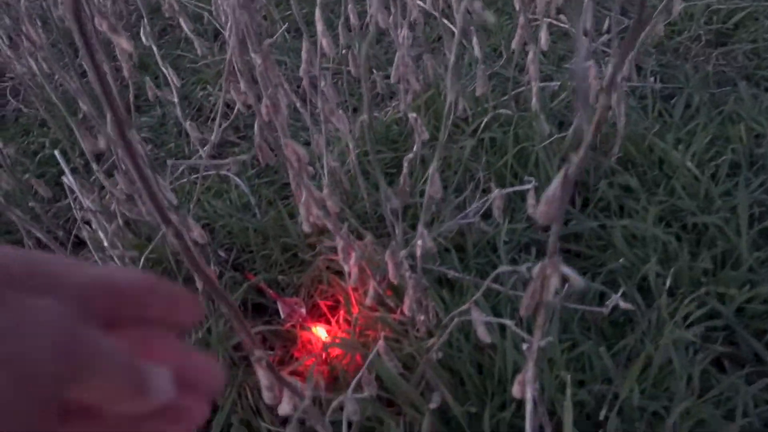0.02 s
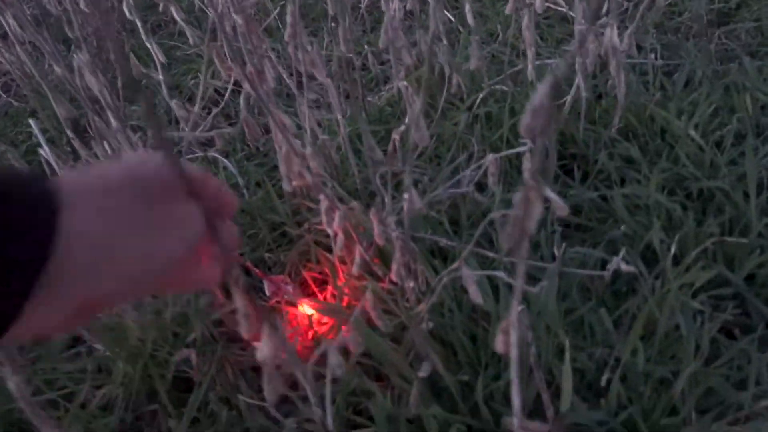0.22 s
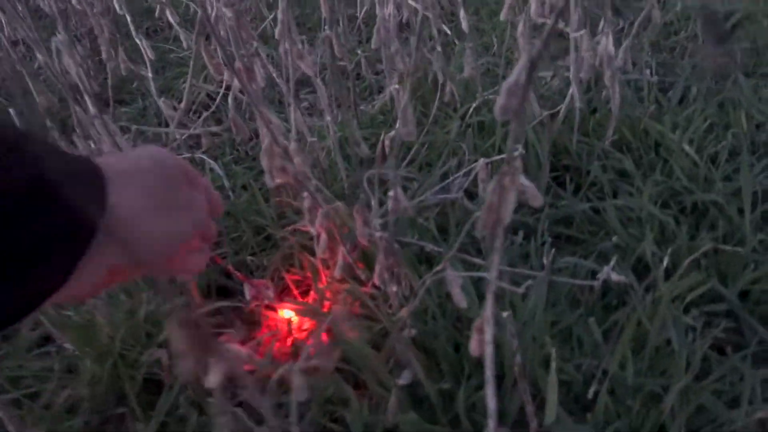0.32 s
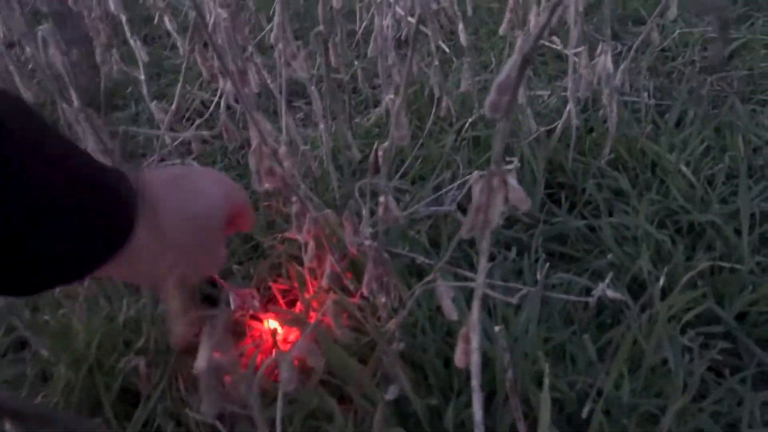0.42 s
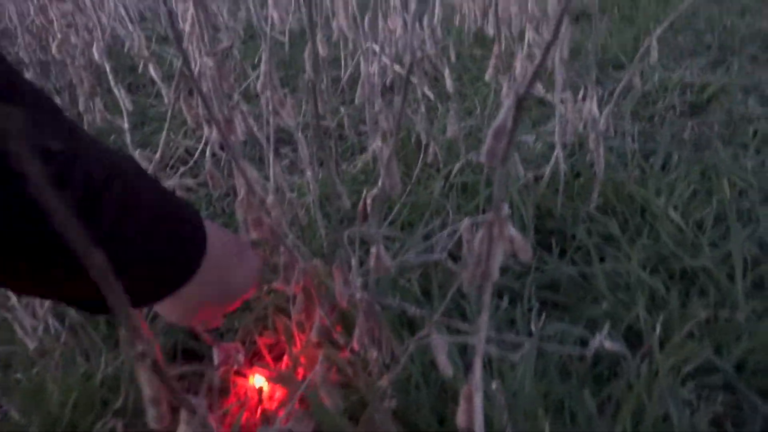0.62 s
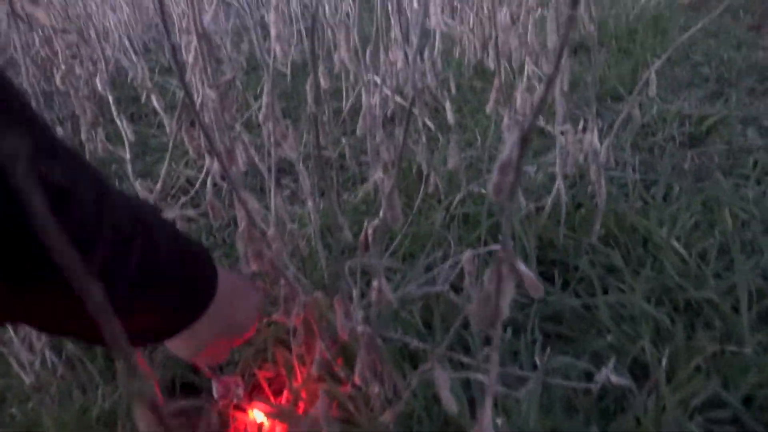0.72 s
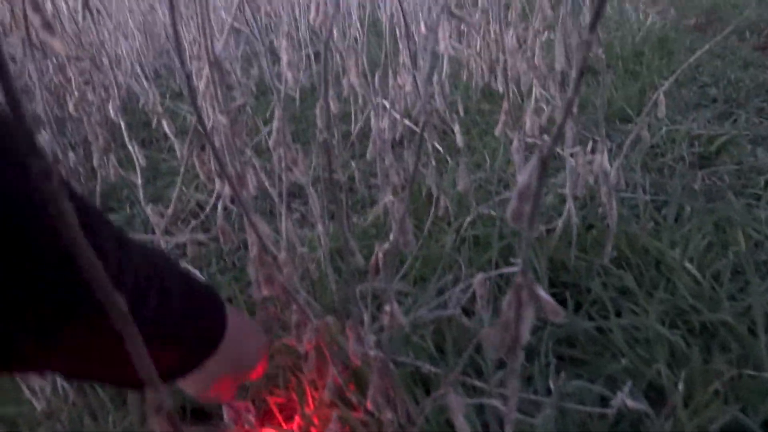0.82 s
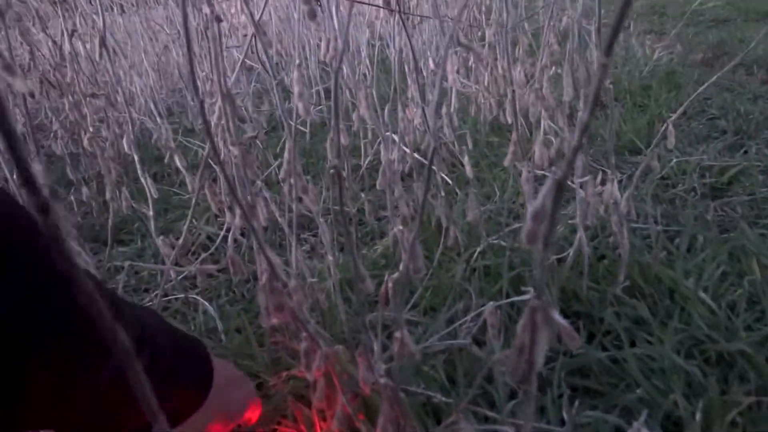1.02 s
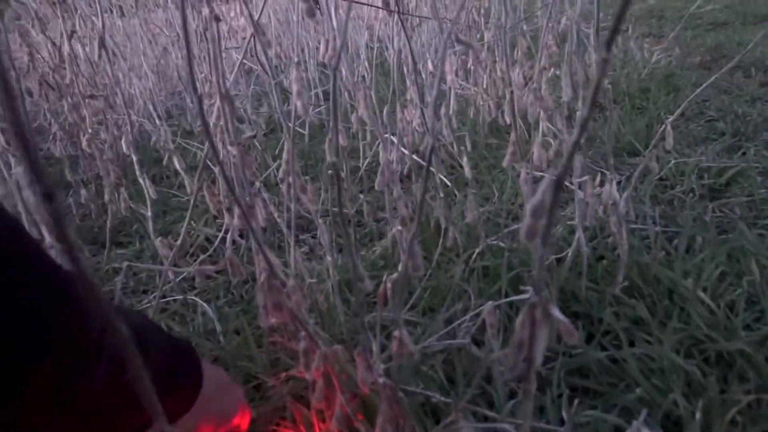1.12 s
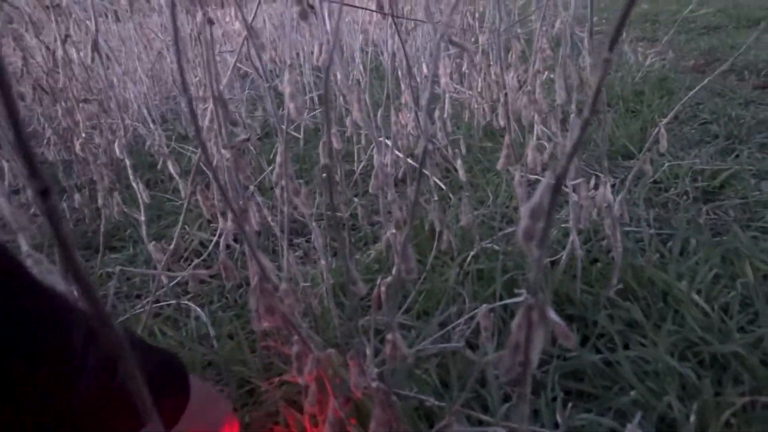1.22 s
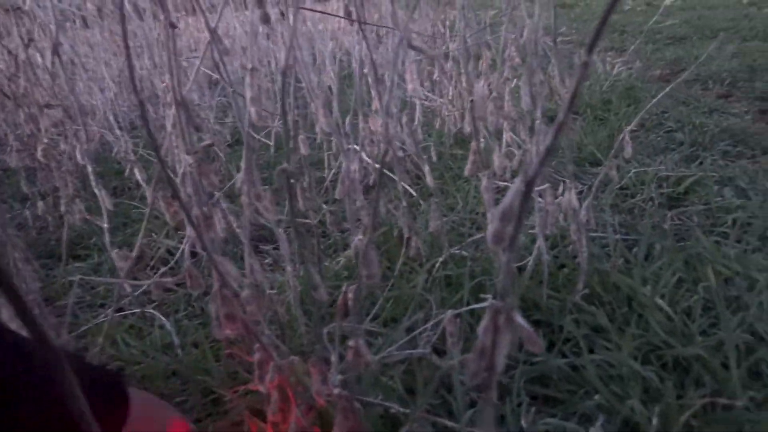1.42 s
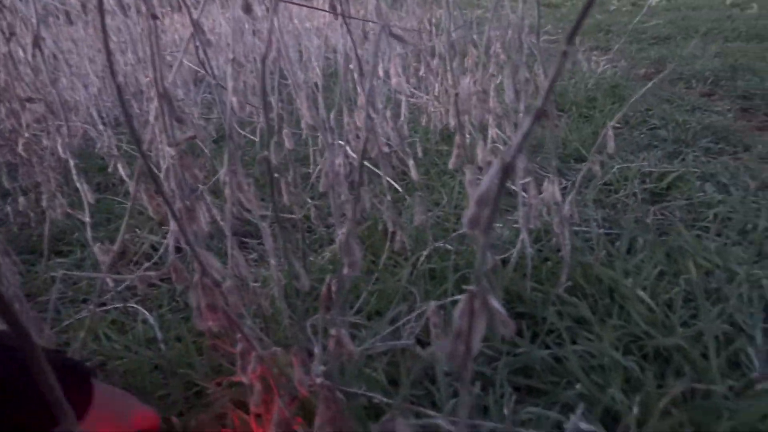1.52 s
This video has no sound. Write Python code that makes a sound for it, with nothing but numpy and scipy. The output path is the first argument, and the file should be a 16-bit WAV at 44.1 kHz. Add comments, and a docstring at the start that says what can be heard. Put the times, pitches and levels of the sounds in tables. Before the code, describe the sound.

One step through brittle dry plants: sparse snaps, cloth rub and dull thud, then a loud bright crackle with rasping stalks and low bumps, fading to scattered clicks over faint open-air rumble, close microphone.

```python
"""A step through dry soybeans

One step through dry standing soybeans, close to a hand-held microphone outdoors.
Pods snap as short noise bursts, stalks scrape as stick-slip clicks through a resonance, and thick stems
crack as ringing modes with a noise tail. Litter rustles and papery leaves tick as random grains.
The sleeve is muffled noise, the foot thuds are damped low swings, and filtered noise makes
the faint outdoor rumble and drone."""
import sys
import numpy as np
from scipy import signal
from scipy.fft import rfft, irfft, next_fast_len
from scipy.io import wavfile

SR = 44100
rng = np.random.default_rng(int(sys.argv[2]) if len(sys.argv) > 2 else 0)


def generate_wav(sig):
    """Save sig (samples, or channels by samples) to the path in sys.argv[1] as 16-bit PCM at SR."""
    pcm = np.round(np.clip(np.atleast_2d(sig).T, -1, 1) * 32767).astype(np.int16)
    wavfile.write(sys.argv[1], SR, pcm)


N = 68355  # samples
T = np.arange(N) / SR  # seconds


def undb(db):
    """Decibels to gain."""
    return 10 ** (np.asarray(db) / 20)


def unit(x):
    """Scale to an rms of one."""
    return x / np.sqrt(np.mean(x ** 2) + 1e-20)


def burst(x):
    """Scale a short sound so its energy equals an rms of one over a hundredth of a second."""
    return x / np.sqrt(np.sum(x ** 2) / (SR / 100) + 1e-20)


def seconds(ms):
    """Milliseconds to seconds, kept just above zero."""
    return ms / 1000 + 1e-6


def noise():
    """White noise."""
    return rng.standard_normal(N)


def curve(points):
    """Gain over time from points in seconds and dB, held flat beyond either end."""
    times, levels_db = np.array(points).T
    return undb(np.interp(T, times, levels_db))


def colour(x, points):
    """Causal minimum-phase filter with a response given as points in Hz and dB."""
    hz, db = np.array(points, float).T
    size = 2 * next_fast_len(N)
    freq = np.maximum(np.arange(size // 2 + 1) * SR / size, 1)
    response_db = np.interp(np.log(freq), np.log(hz), db)
    # folding the cepstrum onto positive times makes the filter causal
    cepstrum = irfft(np.log(undb(response_db)))
    cepstrum[1:size // 2] *= 2
    cepstrum[size // 2 + 1:] = 0
    return irfft(rfft(x, size) * np.exp(rfft(cepstrum)))[:N]


def band(x, lo_hz, hi_hz, order=2):
    """Band-pass between two edges."""
    return signal.sosfilt(signal.butter(order, [lo_hz, hi_hz], 'band', fs=SR, output='sos'), x)


def fade(start, decay_s):
    """Sudden start and exponential decay."""
    return (T >= start) * np.exp(-np.maximum(T - start, 0) / decay_s)


def grains(per_s, spread_db):
    """Random clicks of either sign: a positive spread makes a few stronger, a negative one weaker."""
    size = undb(spread_db * np.minimum(rng.exponential(size=N), 3.5))
    struck = rng.random(N) < per_s / SR
    return unit(struck * np.sign(noise()) * size)


def sweep(x, hz, width_hz):
    """Resonance whose centre moves from sample to sample."""
    # turn the moving centre down to zero, smooth there with two equal poles, then turn back
    turn = np.exp(2j * np.pi * np.cumsum(hz) / SR)
    pole = np.exp(-np.pi * width_hz * np.sqrt(2) / SR)
    smoothed = signal.lfilter([(1 - pole) ** 2], np.poly([pole, pole]), x / turn)
    return (smoothed * turn).real


# Open air around the microphone. Each row: frequency in Hz, response in dB.
AIR_RESPONSE = [(15, -1.5), (28, 7.5), (40, -1.5), (55, -3.5), (100, -18.5), (190, -21.5), (250, -13.5),
                (400, -23), (2000, -33), (6000, -54), (12000, -46), (16000, -34.5)]


def air():
    """Faint outdoor rumble and hiss, as steady filtered noise."""
    return undb(-43.5) * unit(colour(noise(), AIR_RESPONSE))


# Resonances of a faint low drone. Each row: centre in Hz, width in Hz, level in dB before the drone's swell.
DRONE_RESONANCES = [(239.8, 35, -51), (545, 95, -57)]
# Swell of the drone. Each row: time in seconds, gain in dB.
DRONE_SWELL = [(1.25, -7), (1.5, 2)]


def drone():
    """A faint, hollow low drone of narrow noise bands, growing as the rustling dies away."""
    out = np.zeros(N)
    for hz, width_hz, db in DRONE_RESONANCES:
        out += undb(db) * unit(band(noise(), hz - width_hz / 2, hz + width_hz / 2))
    return out * curve(DRONE_SWELL)


# Rustling leaves and litter. Each row: time in seconds, level in dB.
RUSTLE_LEVEL = [(0, -50), (.125, -51), (.165, -42.5), (.2, -48.5), (.235, -40.5), (.258, -45.5), (.29, -38),
                (.35, -43.5), (.405, -40), (.44, -48), (.48, -50), (.52, -48), (.588, -51), (.597, -31.5),
                (.614, -32.5), (.64, -32), (.68, -40.5), (.705, -38), (.745, -39.5), (.775, -40.5),
                (.83, -40), (.88, -44.5), (.94, -51), (1.25, -52.5), (1.28, -46.5), (1.33, -53.5),
                (1.46, -52.5), (1.55, -48)]
# Tone of the litter. Each row: frequency in Hz, response in dB.
RUSTLE_RESPONSE = [(200, -8), (330, 6.5), (750, -1), (1600, 1), (2800, -0.5), (5200, -0.5), (6300, -5),
                   (10000, -6), (16000, -24)]
RUSTLE_GRAINS_PER_S, RUSTLE_SPREAD_DB, RUSTLE_RING_S = 2200, 4.5, 0.00076
RUSTLE_HISS_DB = -3.5  # sliding leaves, relative to the crackle


def rustle():
    """Countless tiny fractures in the dry litter over the hiss of sliding leaves."""
    energy = grains(RUSTLE_GRAINS_PER_S, RUSTLE_SPREAD_DB) ** 2
    # energy fades in half the time that amplitude does
    ringing = signal.fftconvolve(energy, fade(0, RUSTLE_RING_S / 2))[:N]
    crackle = unit(np.sqrt(ringing.clip(0)) * noise())
    litter = crackle + undb(RUSTLE_HISS_DB) * noise()
    return unit(colour(litter, RUSTLE_RESPONSE)) * curve(RUSTLE_LEVEL)


# Pods and thin stalks snapping close by. Each row: start in seconds, decay in ms,
# then low, mid, high and top band levels in dB.
POD_SNAPS = [(0.029, 2, -38.5, -36.5, -30.5, -32), (0.0592, 0.66, -62, -42.5, -38, -56),
             (0.096, 1.8, -34.5, -34.5, -34.5, -32.5), (0.3598, 0.99, -49, -49, -37.5, -33),
             (0.392, 0.89, -43, -45, -42, -38), (0.4502, 8.5, -48, -50, -67, -58),
             (0.4985, 2.6, -41, -39, -36, -37), (0.5997, 0.92, -37, -27, -22.5, -50),
             (0.6102, 2.9, -37.5, -26, -28, -26.5), (0.6966, 3.1, -43, -37.5, -59, -34.5),
             (0.7733, 5.5, -38.5, -33.5, -30, -37.5), (1.008, 3, -45, -47.5, -48, -64),
             (1.107, 1.9, -45.5, -52, -56, -64), (1.1302, 2.3, -60, -69, -44.5, -49.5),
             (1.22, 1.1, -55, -47.5, -45.5, -53), (1.5136, 3.8, -59.5, -49, -41.5, -40.5),
             (1.532, 2.5, -48.5, -43.5, -46.5, -57)]
# Edges of those four bands, in Hz.
SNAP_EDGES_HZ = (260, 1400, 3200, 7200, 13000)
SNAP_TICK_DELAY_S, SNAP_TICK_DB = 0.00018, 2  # the fracture's single tick, over the splintering
SNAP_TAIL_DB, SNAP_TAIL_S = -24.5, 0.01  # scatter, relative to the splintering


def snaps():
    """Each fracture is a sharp splintering burst, followed by a short scatter off nearby plants."""
    out = np.zeros(N)
    for start, decay_ms, *levels_db in POD_SNAPS:
        shape = fade(start, seconds(decay_ms)) + undb(SNAP_TAIL_DB) * fade(start, SNAP_TAIL_S)
        splinter = noise() * shape
        splinter[np.searchsorted(T, start + SNAP_TICK_DELAY_S)] += undb(SNAP_TICK_DB)
        for lo_hz, hi_hz, db in zip(SNAP_EDGES_HZ, SNAP_EDGES_HZ[1:], levels_db):
            out += undb(db) * burst(band(splinter, lo_hz, hi_hz))
    return out


# Thick stems cracking. Each row: start in seconds, level in dB, pitch factor, ring in ms,
# splintering tail in dB before the level, upper modes' gain in dB.
STEM_CRACKS = [(0.0292, -39.5, .45, 1.6, 6, -21), (0.0955, -40.5, 0.52, 0.71, -1.5, -3),
               (0.8609, -32, 1.088, 2.5, -28, -11), (1.2570, -27, 0.987, 1.46, -4.5, -2)]
# Modes of a thick stem. Each row: frequency in Hz before the pitch factor, relative level in dB.
STEM_RESONANCES = [(1720, 7), (1970, 8), (2350, 5.5), (2900, 1), (3500, 2)]
# Tone of the splintering tail. Each row: frequency in Hz, response in dB.
CRACK_TAIL_RESPONSE = [(300, 2.5), (1250, -7.5), (2100, 3), (4000, 4), (6000, -16), (9000, -5.5),
                       (16000, -37)]
STEM_UPPER_HZ = 2300  # modes listed above this count as upper
CRACK_TAIL_S = 0.0071


def cracks():
    """A thick stem gives way with a woody knock and a brief splintering tail."""
    out = np.zeros(N)
    for start, db, pitch, ring_ms, tail_db, upper_db in STEM_CRACKS:
        modes = np.zeros(N)
        for hz, mode_db in STEM_RESONANCES:
            gain = undb(mode_db + upper_db * (hz > STEM_UPPER_HZ))
            modes += gain * np.sin(2 * np.pi * hz * pitch * (T - start))
        knock = band(modes * fade(start, seconds(ring_ms)), 1600 * pitch, 8700, order=1)
        tail = unit(colour(noise(), CRACK_TAIL_RESPONSE)) * fade(start, CRACK_TAIL_S)
        out += undb(db) * burst(knock + undb(tail_db) * tail)
    return out


def catching():
    """Uneven gain of dry leaves that catch and let go."""
    spacing_s, depth_db = 0.0026, 4  # a random level every few ms, joined by straight lines in dB
    step = T / spacing_s
    return unit(undb(depth_db * np.interp(step, np.arange(N), noise())))


# Papery leaves brushed aside. Each row: time in seconds, level in dB.
LEAF_LEVEL = [(.125, -69), (.145, -41), (.205, -60), (.3, -49), (.385, -42.5), (.46, -78), (.585, -80),
              (.6, -32), (.675, -47), (.705, -41), (.745, -47), (.782, -47), (.88, -59)]
LEAF_GRAINS_PER_S, LEAF_SPREAD_DB = 2100, 5.5


def leaves():
    """Papery leaves give fine, bright ticks in uneven clusters."""
    ticks = band(grains(LEAF_GRAINS_PER_S, LEAF_SPREAD_DB), lo_hz=5600, hi_hz=13800)
    return unit(ticks * catching()) * curve(LEAF_LEVEL)


# Stalks rasping over each other. Each row: peak in seconds, rise in ms, fall in ms,
# resonance at the peak in Hz, width in Hz, level in dB, hiss relative to the pod in dB.
STALK_SCRAPES = [(0.139, 2.3, 27, 10000, 4500, -48, -15), (0.151, 7.2, 7.7, 4580, 1070, -29.5, 1),
                 (0.301, 11.4, 4.1, 4500, 500, -33.5, 0), (.335, 38, 33, 5260, 280, -39.5, -16),
                 (0.4527, 1.4, 3.6, 4400, 1590, -31, -20), (0.595, 2.3, 3, 8150, 3000, -26.5, -5),
                 (0.6098, 1.3, 2.7, 4250, 1280, -16.5, -5.5), (0.6271, 1.6, 2.9, 5000, 1500, -19, 8),
                 (0.6436, 2.4, 2.6, 4930, 1400, -24.5, 2), (0.6585, 2.5, 2.4, 4900, 1400, -28, -5),
                 (0.67, 2.3, 3, 4870, 1300, -30, -21), (0.698, 7.5, 9.2, 3440, 250, -36, -5),
                 (0.784, 17, 13, 5400, 1400, -34.5, 12), (0.8384, 2.3, 4.2, 9000, 2500, -31.5, 3),
                 (.861, 0.74, 1.4, 4650, 1000, -29, -30)]
SLIPS_PER_S, SLIP_SPREAD_DB = 24000, -3.5
SWELL_ROUNDNESS = 1.52  # exponent of the rise and fall
GLIDE_LIMIT_HZ, GLIDE_FADE_MS = 1360, 6.4  # quick scrapes chirp upward, slow ones nearly hold their pitch


def scrapes():
    """Quick stick-slip clicks swell and die, ringing a hollow pod whose pitch climbs as the contact slides."""
    out = np.zeros(N)
    for peak, rise_ms, fall_ms, hz, width_hz, db, hiss_db in STALK_SCRAPES:
        progress = (T - peak) / np.where(T < peak, seconds(rise_ms), seconds(fall_ms))
        swell = np.exp(-abs(progress) ** SWELL_ROUNDNESS)
        slips = grains(SLIPS_PER_S, SLIP_SPREAD_DB)
        glide_hz = GLIDE_LIMIT_HZ * np.exp(-(rise_ms + fall_ms) / GLIDE_FADE_MS)
        centre_hz = hz + glide_hz * np.tanh(progress)
        pod = unit(swell * sweep(slips, centre_hz, width_hz))
        hiss = unit(swell * band(noise(), 3650, 9500))
        # the swell's own rms keeps the level independent of how long the scrape lasts
        swell_rms = np.sqrt(np.mean(swell ** 2))
        out += undb(db) * swell_rms * unit(pod + undb(hiss_db) * hiss)
    return out


# Sleeve rubbing near the microphone. Each row: time in seconds, level in dB.
SLEEVE_LEVEL = [(0, -77), (.19, -45.5), (.23, -34), (.255, -33), (.30, -26.5), (.332, -29.5), (.35, -39),
                (.44, -46), (.55, -49), (.588, -36.5), (.605, -26.5), (.65, -46), (.71, -47), (.77, -44.5),
                (.86, -47), (.925, -41), (.96, -51.5), (1.55, -52.5)]
# Tone of the cloth. Each row: frequency in Hz, response in dB.
SLEEVE_RESPONSE = [(40, -3), (75, -11), (105, 3.5), (135, -3.5), (190, -2.5), (270, -8.5), (400, -20),
                   (700, -18), (1500, -46)]


def sleeve():
    """Cloth rubs with a low, muffled flutter of filtered noise."""
    return unit(colour(noise(), SLEEVE_RESPONSE)) * curve(SLEEVE_LEVEL)


# Dull bumps of feet and arm. Each row: start in seconds, swing in Hz, level in dB, rise in ms,
# decay in ms, knock relative to the level in dB.
BODY_THUDS = [(0.2934, 107.7, -19.5, 1.9, 12, -22), (0.433, 58, -35.5, 8.9, 14.4, -9.5),
              (.594, 136, -31, 3.8, 19, -7.5), (0.629, 39.1, -15, 11, 22.7, -23),
              (0.692, 36.7, -22, 3.1, 67, -31), (0.761, 42.3, -23, 2.9, 28, -21.5),
              (0.898, 72.5, -31.5, 7.1, 12, -12.5), (.926, 433, -37.5, 3, 5.3, -18),
              (1.106, 65.6, -22.5, 0.92, 10.6, -16)]


def thuds():
    """Each bump is a heavily damped low swing with a dull knock on top."""
    out = np.zeros(N)
    for start, hz, db, rise_ms, decay_ms, knock_db in BODY_THUDS:
        age = np.maximum(T - start, 0)
        shape = (1 - np.exp(-age / seconds(rise_ms))) * fade(start, seconds(decay_ms))
        swing = -np.sin(2 * np.pi * hz * age)
        knock = undb(knock_db) * unit(band(noise(), lo_hz=200, hi_hz=304))
        out += undb(db) * shape / shape.max() * (swing + knock)
    return out


def scene():
    """All sources at one microphone."""
    surroundings = air() + drone()
    plants = rustle() + snaps() + cracks() + leaves() + scrapes()
    walker = sleeve() + thuds()
    return (surroundings + plants + walker)[None]


def record(dry):
    """The recorder cuts the top steeply above 15.7 kHz."""
    top_cut = signal.ellip(10, .2, 80, 15700, fs=SR, output='sos')  # ripple and stop-band depth in dB
    return signal.sosfilt(top_cut, dry)


dry = scene()
out = record(dry)
generate_wav(out)
```